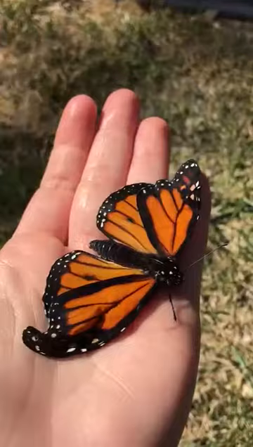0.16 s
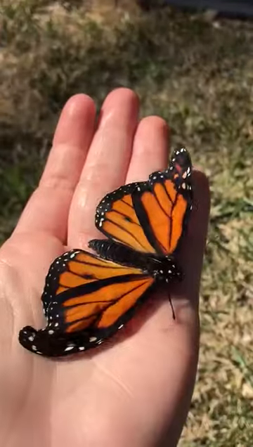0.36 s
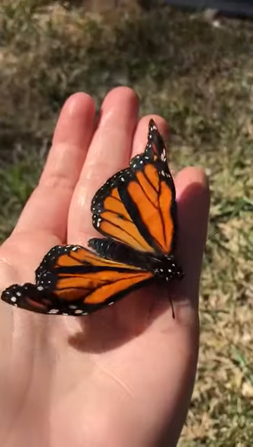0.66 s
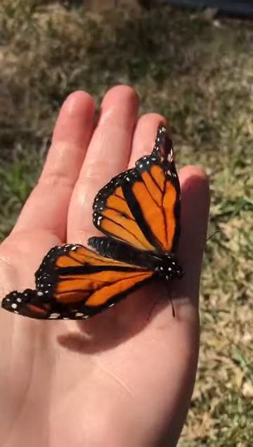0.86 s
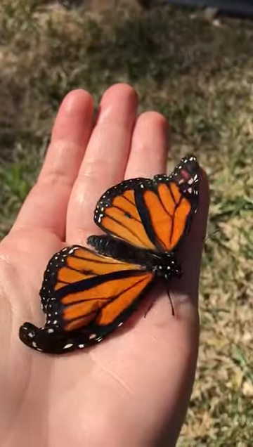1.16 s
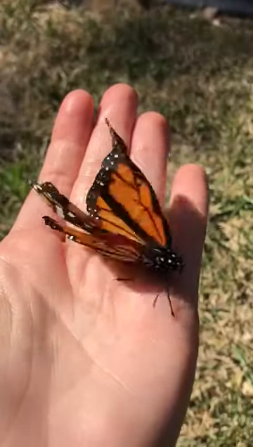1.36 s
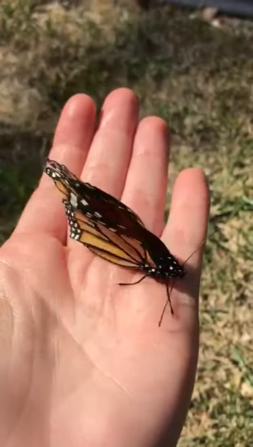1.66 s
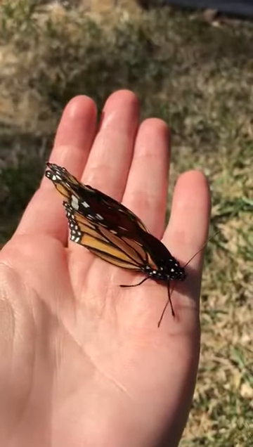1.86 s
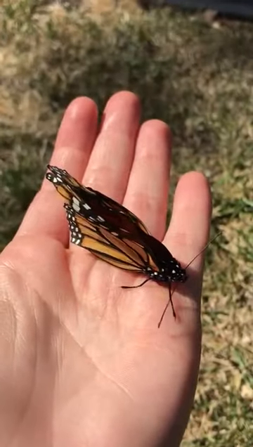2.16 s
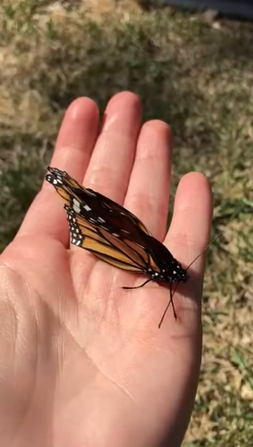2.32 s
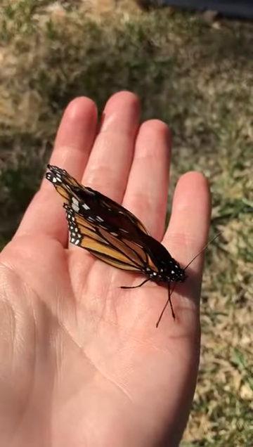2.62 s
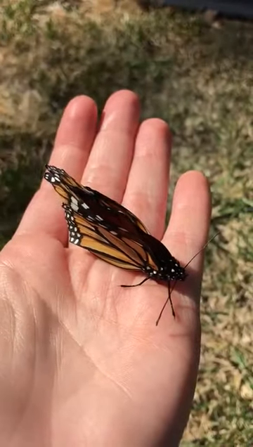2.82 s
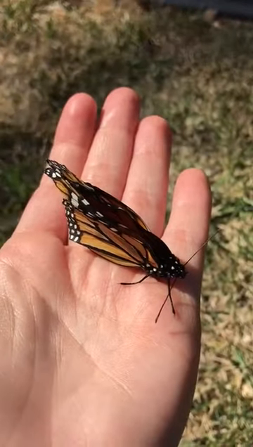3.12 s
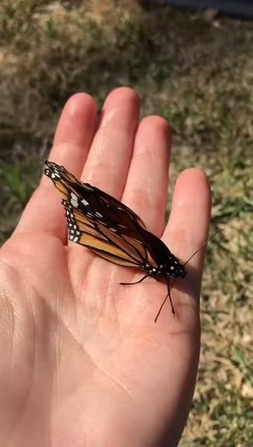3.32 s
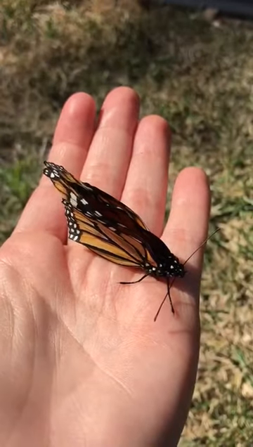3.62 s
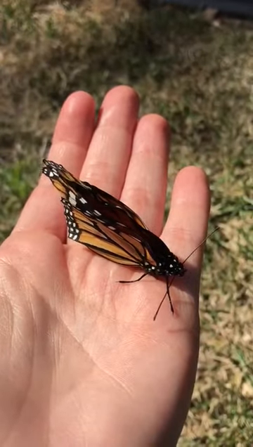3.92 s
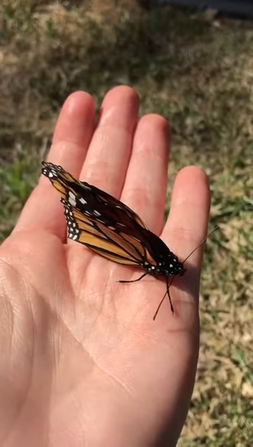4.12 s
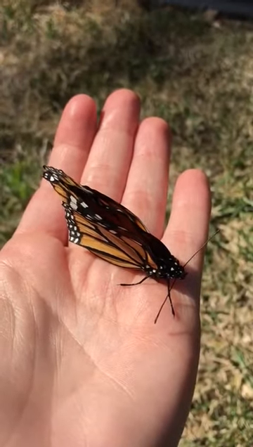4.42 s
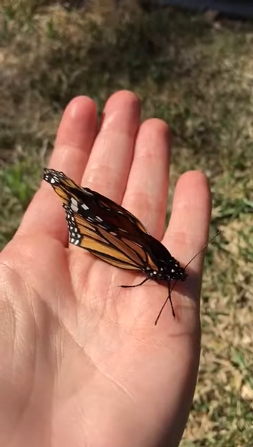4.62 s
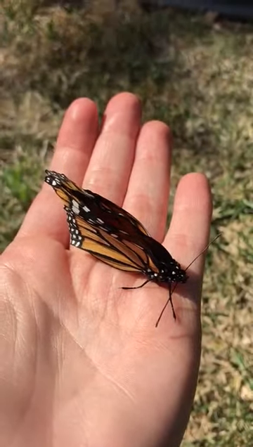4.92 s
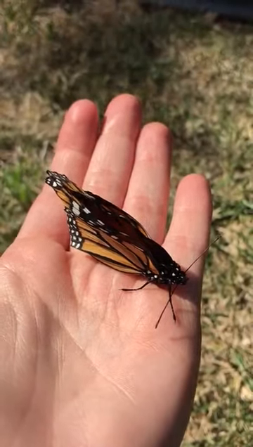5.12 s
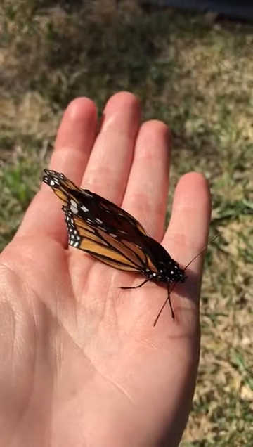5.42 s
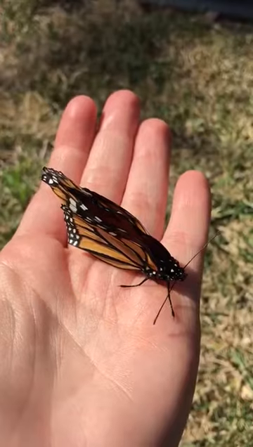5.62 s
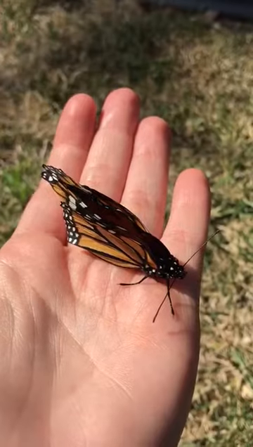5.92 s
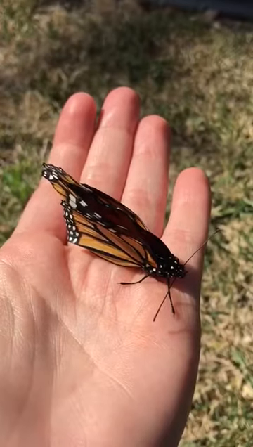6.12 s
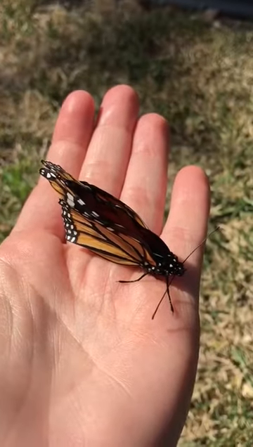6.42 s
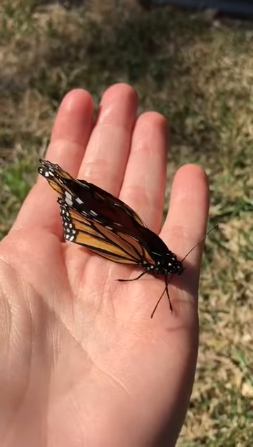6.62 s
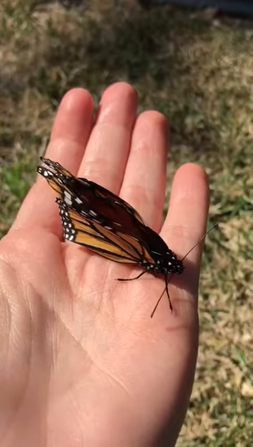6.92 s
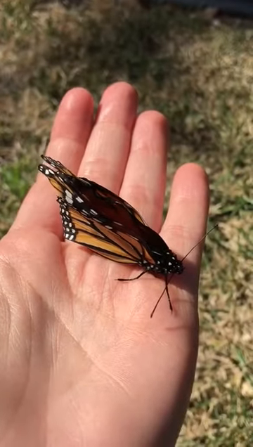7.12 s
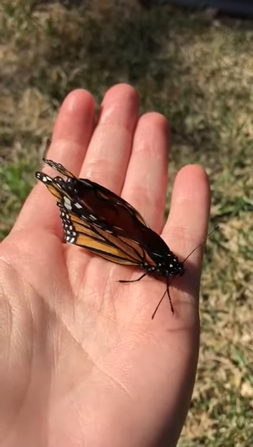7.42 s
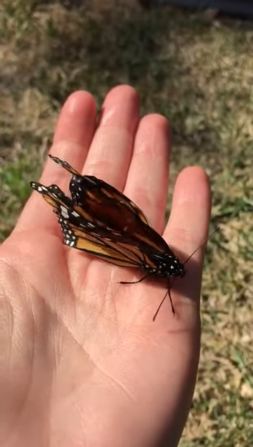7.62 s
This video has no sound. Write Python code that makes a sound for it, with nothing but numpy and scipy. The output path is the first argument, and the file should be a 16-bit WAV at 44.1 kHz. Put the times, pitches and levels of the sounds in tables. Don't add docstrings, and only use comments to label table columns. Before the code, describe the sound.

Far-off propeller drone wavers outdoors, slowly sinking in pitch over soft road hiss and an early vehicle rumble, while small birds chirp faintly.

```python
import sys
import numpy as np
from scipy import signal
from scipy.fft import rfft, irfft, next_fast_len
from scipy.io import wavfile
from scipy.ndimage import uniform_filter1d

SR = 44100
rng = np.random.default_rng(int(sys.argv[2]) if len(sys.argv) > 2 else 0)


def master_out(mix):
    frames = np.transpose(np.atleast_2d(mix))
    ceiling = np.clip(frames, -1, 1)
    pcm = np.round(ceiling * 32767).astype(np.int16)
    wavfile.write(sys.argv[1], SR, pcm)


def gain_from_db(level_db):
    decades = np.asarray(level_db, float) / 20
    return 10 ** decades


N = 342216

# time_s, level_db
CLEARNESS = [(0, -51), (1.1, -54), (1.55, -55), (1.9, -52), (2.85, -47.5), (3.3, -49.5), (3.95, -53),
             (4.6, -51.5), (4.97, -58), (5.5, -54), (5.85, -58), (6.2, -54.5), (7.0, -57), (7.76, -54.5)]


def rms_one(x):
    return x / np.sqrt(np.mean(x ** 2) + 1e-20)


def in_time(rows):
    times_s, *columns = np.transpose(rows)
    return [np.interp(np.arange(N) / SR, times_s, column) for column in columns]


def drift(rate_hz):
    r = np.exp(-80 * np.pi * rate_hz / SR)
    noise = rng.standard_normal(N // 40 + 2002)
    slow = signal.lfilter([1], [1, -2 * r, r * r], noise)[2000:]
    return np.interp(np.arange(N) / 40, np.arange(len(slow)), rms_one(slow))


def tone(pitch_hz, start_turns=None):
    start = rng.random() if start_turns is None else start_turns
    turns = np.cumsum(pitch_hz) / SR + start
    return np.sqrt(2) * np.sin(2 * np.pi * turns)


def coloured(spectrum, patchy_db):
    size = next_fast_len(N)
    hz = np.maximum(np.fft.rfftfreq(size, 1 / SR), 1)
    points_hz, points_db = np.transpose(spectrum)
    curve_db = np.interp(np.log(hz), np.log(points_hz), points_db, -120, -120)
    shaped = rfft(rng.standard_normal(size)) * gain_from_db(curve_db)
    octave = np.log2(hz / points_hz[0])
    out, together = 0, drift(2.0)
    for k in range(int(np.log2(points_hz[-1] / points_hz[0])) + 2):
        band = irfft(shaped * np.clip(1 - abs(octave - k), 0, 1), size)[:N]
        flicker_db = patchy_db * (.5 * together + drift(3.9))
        out = out + band * gain_from_db(flicker_db)
    return rms_one(out)


def note(length_s, from_hz, to_hz, width_hz, core, edge):
    u = np.linspace(0, 1, int(length_s * SR))
    r = np.exp(-np.pi * abs(width_hz) / SR)
    white = rng.standard_normal((2, len(u) + 6000))
    blur = signal.lfilter([1], [1, -2 * r, r * r], white[0] + 1j * white[1])[-len(u):]
    blur = core + blur / np.sqrt(np.mean(abs(blur) ** 2))
    glide = np.exp(2j * np.pi * np.cumsum(from_hz + (to_hz - from_hz) * u) / SR)
    soft_ends = np.minimum(edge * np.sin(np.pi * u), 1)
    return rms_one((blur * glide).real) * soft_ends


def add(out, start_s, piece):
    i = round(start_s * SR)
    out[i:i + len(piece)] += piece[:N - i]


def shaft():
    start_hz, sink_hz_per_s = 18.345, .058
    return start_hz - sink_hz_per_s * np.arange(N) / SR


def microphone_hiss():
    # pitch_hz, level_db (per Hz)
    mic_colour = [(2500, -10.5), (5000, 0), (7100, -3), (7600, -10), (8400, -3), (9800, -5), (10400, -9.5),
                  (11000, -6.5), (12100, -12.5)]
    return gain_from_db(-77.5) * coloured(mic_colour, patchy_db=0.95)


def far_road():
    # pitch_hz, level_db (per Hz)
    tyre_colour = [(450, -16.5), (620, -3), (1000, -1.5), (1500, -8.5), (2000, -13.5), (2500, -16),
                   (2820, -19.5), (4300, -22.5), (4900, -28.5), (5400, -27.5), (8000, -35), (12100, -47)]
    # time_s, level_db
    road_level = [(0, -52.5), (1.2, -53), (2.9, -53.5), (3.5, -56), (4.7, -55.5), (5.2, -57.5),
                  (5.5, -58.5), (7.76, -59.5)]
    return gain_from_db(in_time(road_level)[0]) * coloured(tyre_colour, patchy_db=1.05)


def vehicle_rumble():
    # pitch_hz, level_db (per Hz)
    rumble_colour = [(20, -28.5), (34, -12), (45, -6), (70, -0.5), (130, -9.5), (200, -7), (270, -14.5)]
    nearest_s, nearest_db = 0.41, -46
    rise_db_per_s, fade_db_per_s = 13, 2
    since_s = np.arange(N) / SR - nearest_s
    level_db = nearest_db - np.maximum(fade_db_per_s * since_s, -rise_db_per_s * since_s)
    return gain_from_db(level_db) * coloured(rumble_colour, patchy_db=0.0)


def falling_whistle():
    # start_s, length_s, start_hz, settled_hz, settling_s, level_db
    whistle = (6.045, .31, 6150, 4530, .09, -76)
    start_s, length_s, from_hz, to_hz, settling_s, level_db = whistle
    since_s = np.clip(np.arange(N) / SR - start_s, 0, length_s)
    shape = np.minimum(since_s / .015, 1) * (1 - (since_s / length_s) ** 4)
    pitch_hz = to_hz + (from_hz - to_hz) * np.exp(-since_s / settling_s)
    return gain_from_db(level_db + 1.5 * drift(40)) * shape * tone(pitch_hz)


def birds():
    # start_s, length_s, start_hz, end_hz, level_db
    chirps = [(.31, .11, 4450, 4300, -70), (1.94, .07, 4500, 4500, -75), (2.13, .05, 4400, 4050, -66),
              (2.82, .2, 4350, 4750, -77), (3.17, .17, 4680, 4580, -77), (3.33, .1, 4650, 4180, -72),
              (3.32, .08, 5950, 5880, -76), (4.7, .1, 4900, 5000, -80), (5.85, .1, 4300, 4600, -79),
              (7.025, .05, 4550, 4200, -71), (7.22, .03, 4350, 4750, -75), (7.49, .15, 4280, 4220, -72.5)]
    # start_s, length_s, start_hz, end_hz, level_db
    clear_notes = [(.32, .09, 4490, 4370, -72), (.455, .15, 3720, 4060, -68), (1.95, .06, 4200, 4180, -70),
                   (2.02, .1, 4190, 4190, -80), (2.16, .06, 4000, 3930, -73), (2.18, .07, 3520, 3400, -77),
                   (3.225, .04, 4180, 4300, -71), (3.45, .17, 4120, 4050, -80),
                   (4.17, .15, 3780, 3880, -80), (4.74, .2, 3380, 3340, -77), (5.79, .1, 4200, 4650, -76),
                   (7.6, .16, 3540, 3720, -80)]
    # start_s, length_s, pitch_hz, level_db
    pipes = [
        (3.43, .47, 3110, -80),
        (5.78, .11, 2760, -79),
        (5.92, .1, 2760, -78),
    ]
    burr_hz, note_blur_hz, pipe_blur_hz = 300, 70, 14
    note_sag_db = 7
    out = falling_whistle()
    for start_s, length_s, from_hz, to_hz, level_db in chirps:
        add(out, start_s, gain_from_db(level_db + 1.5) * note(length_s, from_hz, to_hz, burr_hz, .5, 1.8))
    for start_s, length_s, from_hz, to_hz, level_db in clear_notes:
        sag = gain_from_db(np.linspace(.5, -.5, int(length_s * SR)) * note_sag_db)
        call = sag * note(length_s, from_hz, to_hz, note_blur_hz, 2.5, 3.5)
        add(out, start_s, gain_from_db(level_db + 1.5) * call)
    for start_s, length_s, pitch_hz, level_db in pipes:
        add(out, start_s, gain_from_db(level_db + 1.5) * note(length_s, pitch_hz, pitch_hz, pipe_blur_hz, 3.0, 4.0))
    echoes = rng.standard_normal(6000) * gain_from_db(-60 * np.arange(6000) / SR / .3)
    echoes[:1200] = 0
    return out + gain_from_db(-34) * signal.fftconvolve(out, echoes)[:N]


def exhaust_roar():
    # pitch_hz, level_db (per Hz)
    roar_colour = [(140, -23.5), (230, -10.5), (249, -4.5), (306, -5), (340, -2.5), (439, -9.5), (493, -13),
                   (579, -4), (800, -25.5), (1040, -25.5), (1760, -120)]
    chop = 1 + 0.23 * tone(3 * shaft())
    return gain_from_db(in_time(CLEARNESS)[0] - 5.0) * chop * coloured(roar_colour, patchy_db=2.1)


def exhaust_patches():
    # start_s, length_s, pitch_hz, width_hz, level_db
    patches = [(1.758, .11, 580, 24, -53), (2.38, .26, 1022, 110, -51), (2.3, .5, 340.5, 30, -52),
               (1.95, .6, 436, 20, -58.5), (2.85, .8, 345, 40, -56), (2.73, .36, 591, 104, -49),
               (2.75, .85, 395, 90, -55.5), (2.717, 0.24, 973, 85, -56.5), (2.962, 0.15, 986, 110, -53),
               (3.09, .24, 573, 80, -49), (3.102, .3, 440, 76, -54), (3.31, .28, 601, 100, -49.5),
               (4.105, 0.18, 560, 140, -57), (4.452, 0.41, 530, 70, -60), (4.2, .3, 1035, 160, -58.5),
               (5.65, 0.37, 647, 73, -59.5), (6.46, .15, 905, 50, -55.5), (6.567, 0.27, 575, 35, -56),
               (6.76, .1, 880, 40, -59.5), (3.328, .1, 984, 78, -58), (6.8, .2, 655, 37, -60),
               (7.358, 0.15, 900, 140, -60), (7.5, .12, 620, 110, -54.5)]
    out = np.zeros(N)
    for start_s, length_s, hz, width_hz, level_db in patches:
        add(out, start_s, gain_from_db(level_db) * note(length_s, .98 * hz, 1.02 * hz, 1.4 * width_hz, .3, 1.5))
        octave_db = -11.5 if hz > 940 else -25.5
        octave = note(length_s, 1.9 * hz, 1.9 * hz, 1.2 * width_hz, 0.16, 1.0)
        add(out, start_s, gain_from_db(level_db + octave_db) * octave)
    turns = np.cumsum(shaft()) / SR
    return out * (1 + 0.23 * np.cos(2 * np.pi * turns + 1.9))


def propeller():
    # time_s, order_6_level_db, order_9_ground_echo_lift_db
    air_path = [(0, -42.5, -2.5), (.4, -40, -2.5), (.85, -42, -2), (1.25, -37.5, -4), (1.6, -35.5, -3.5),
                (1.92, -32.5, -2), (2.46, -36.5, 2.5), (2.78, -33.5, 0), (3.3, -33, -4.5),
                (3.45, -35.5, -5.5), (4.1, -36.5, -5), (4.62, -42, 1), (5.06, -43.5, -5), (5.27, -39.5, -5),
                (6.12, -40, -12.5), (6.55, -44, -2), (6.98, -39.5, -8.5), (7.62, -39.5, -13)]
    # time_s, first_engine_db, second_engine_db
    engines = [(0, -50, -54), (.3, -45.5, -43), (.9, -45.5, -44), (1.5, -52, -47), (1.9, -54, -49),
               (2.4, -52.5, -61), (3.1, -49.5, -61.5), (3.7, -51, -60), (4.2, -67, -62), (4.85, -66, -53),
               (5.8, -68, -55), (6.6, -70, -63), (6.95, -66, -58), (7.76, -66, -60)]
    # middle_s, length_s, level_db
    order_12_swells = [(.8, 0.56, -52), (1.308, 0.45, -55.5), (2.2, 1.0, -47), (2.897, 0.86, -52.5),
                       (3.915, 0.48, -55.5), (4.494, 0.89, -60.5), (5.996, 0.29, -59.5),
                       (6.41, 0.88, -58.5), (7.513, 0.82, -54)]
    # order (times shaft speed), level_db (under the swell)
    weak_orders = [(2, -31), (4, -24.5), (5, -17.5), (7, -19), (8, -24.5), (10, -25.5), (11, -27.5),
                   (16, -29), (19, -25.5), (21, -28), (24, -28.5), (32, -31)]
    crest_turns, opposed_turns = .25, .5
    beat_hz, cancel_s = 1.53, .56
    time_s = np.arange(N) / SR
    level_db, lift_db = in_time(air_path)
    first_db, second_db = in_time(engines)
    shaft_hz = shaft() * (1 + .0008 * drift(2))

    out = gain_from_db(level_db + 1.0 * drift(2.7) + .5 * drift(21)) * tone(6 * shaft_hz, crest_turns)
    order_9_db = level_db + lift_db + 1.2 * drift(3.4) + .5 * drift(17)
    out = out + gain_from_db(order_9_db) * tone(9 * shaft_hz, crest_turns)
    out = out + gain_from_db(first_db + .8 * drift(3.0)) * tone(3 * shaft_hz, crest_turns)
    second_start = crest_turns + opposed_turns - beat_hz * cancel_s
    out = out + gain_from_db(second_db + 2.1 * drift(2.1)) * tone(3 * shaft_hz + beat_hz, second_start)
    order_12 = gain_from_db(-66.5)
    for middle_s, length_s, swell_db in order_12_swells:
        order_12 = order_12 + gain_from_db(swell_db) * np.cos(np.pi * np.clip((time_s - middle_s) / length_s, -.5, .5))
    out = out + order_12 * gain_from_db(1.3 * drift(7.5)) * tone(12 * shaft_hz)

    low = gain_from_db(0.5 * uniform_filter1d(level_db + lift_db + 29, size=SR // 2))
    high = gain_from_db(0.95 * (in_time(CLEARNESS)[0] + 48.5) - .5 * time_s)
    twinkles = [gain_from_db(3.65 * drift(1.26)) for _ in range(7)]
    orders = {k: -31 - 0.4146 * (k - 14) for k in range(14, 35)}
    for k, order_db in weak_orders:
        orders[round(k)] = order_db
    for k, order_db in orders.items():
        swell = low if k < 13 else high
        out = out + gain_from_db(order_db - 35.5) * swell * twinkles[k % 7] * tone(k * shaft_hz)
    return out


def scene():
    background = microphone_hiss() + far_road() + vehicle_rumble() + birds()
    plane = exhaust_roar() + exhaust_patches() + propeller()
    return (background + plane)[None]


def dropouts(x):
    hz, _, cells = signal.stft(x, SR, nperseg=1024)
    chance = rng.random((len(hz) // 4 + 1, cells.shape[2] // 2 + 1))
    chance = chance.repeat(4, 0).repeat(2, 1)
    share = np.interp(hz, [2500, 5000, 9500, 10400, 10900, 11600, 11800], [0, .04, .06, .16, .04, .05, .5])
    gate = np.where(chance[:len(hz), :cells.shape[2]] < share[:, None], .08, 1)
    strength = abs(cells)
    usual = np.median(strength, axis=2, keepdims=True)
    quiet = uniform_filter1d(strength, size=3, axis=1) < 1.8 * usual
    gate = np.where(quiet, gate, 1)
    return signal.istft(cells * gate, SR, nperseg=1024)[1][:, :N]


def band_limit(x):
    return signal.sosfilt(signal.butter(12, 12000, fs=SR, output="sos"), x)


def record(dry):
    return band_limit(dropouts(dry))


dry = scene()
out = record(dry)
master_out(out)
```